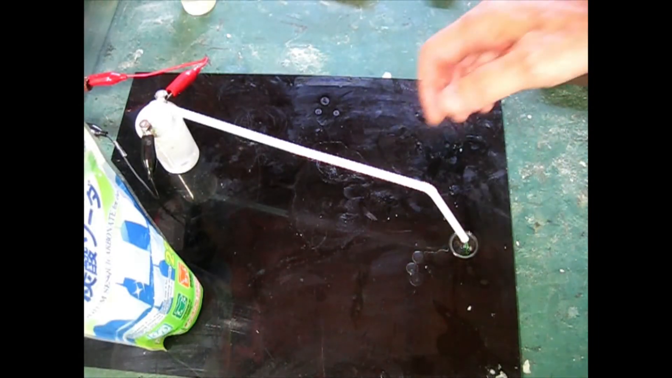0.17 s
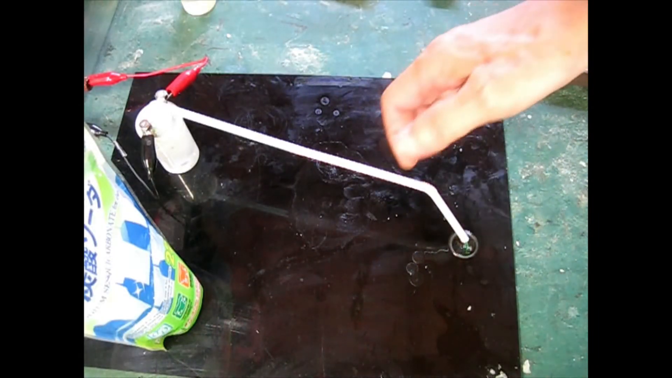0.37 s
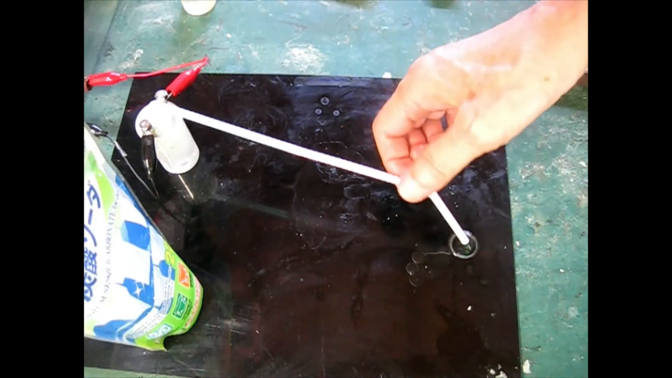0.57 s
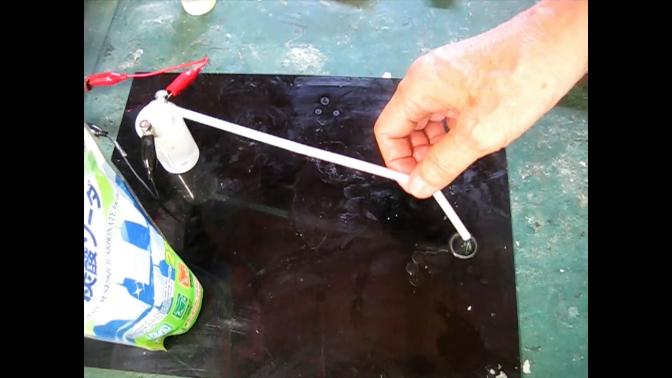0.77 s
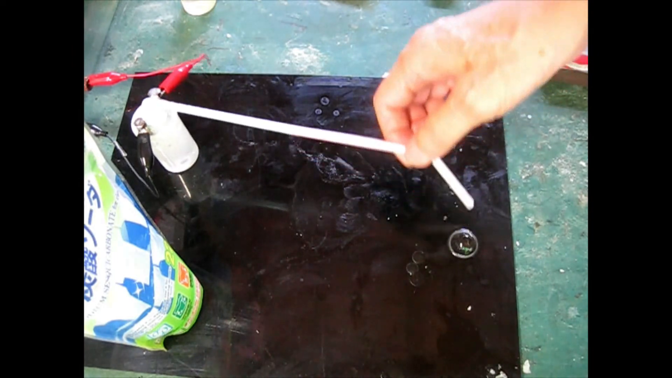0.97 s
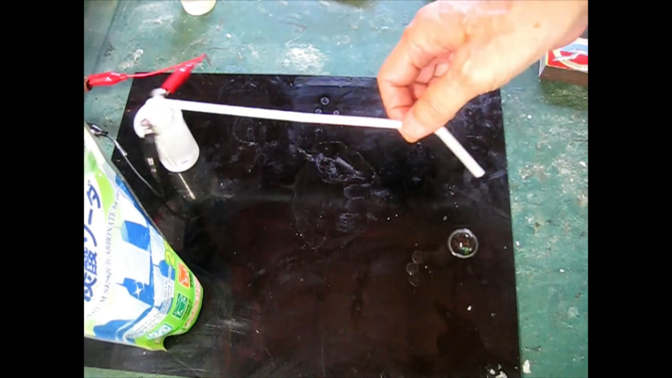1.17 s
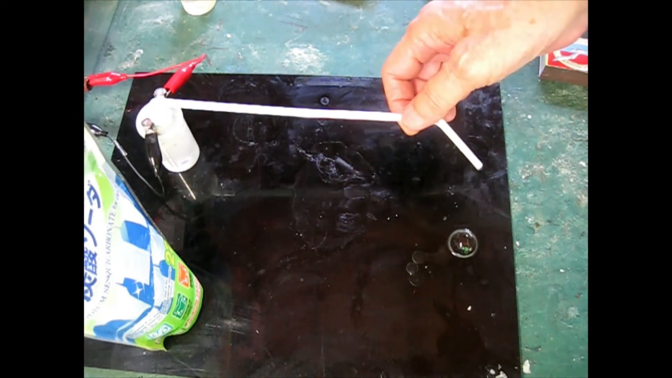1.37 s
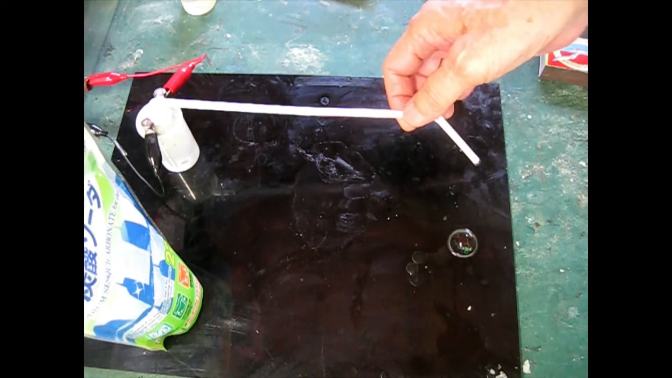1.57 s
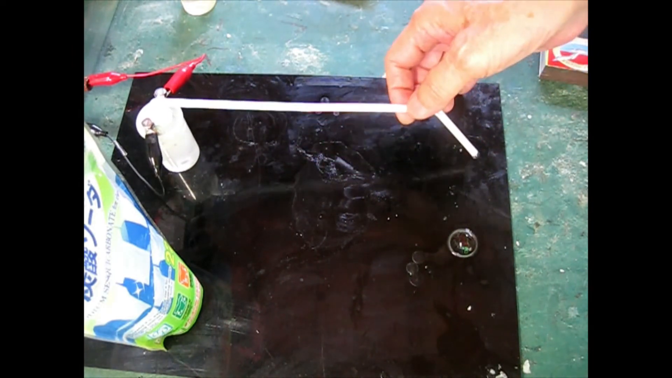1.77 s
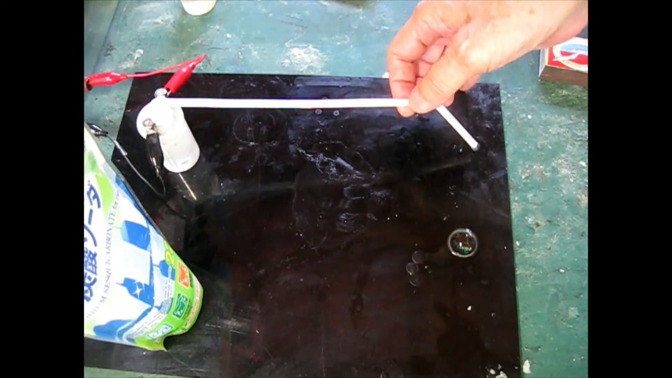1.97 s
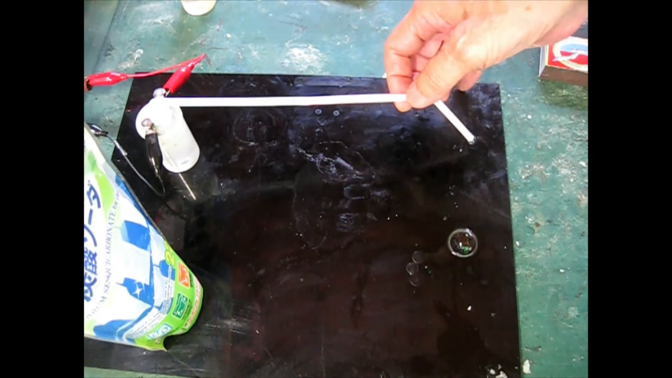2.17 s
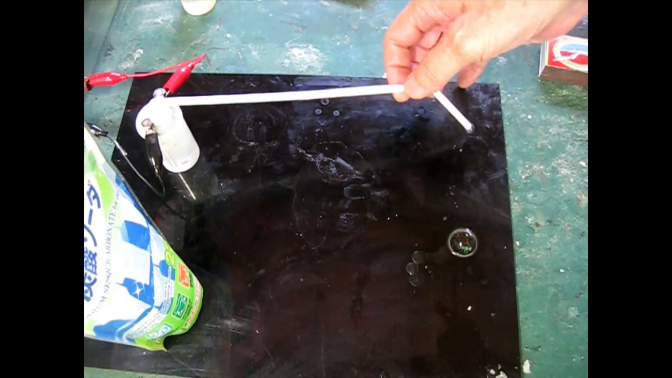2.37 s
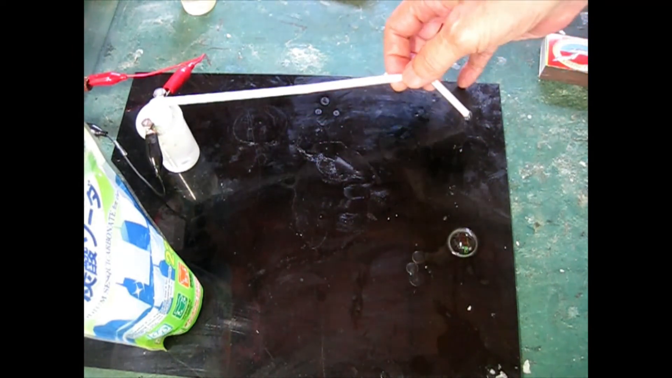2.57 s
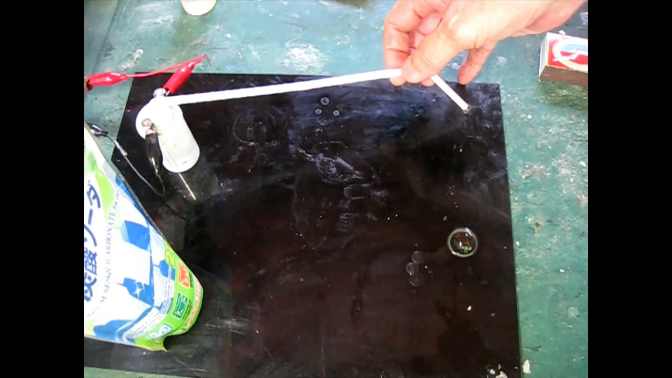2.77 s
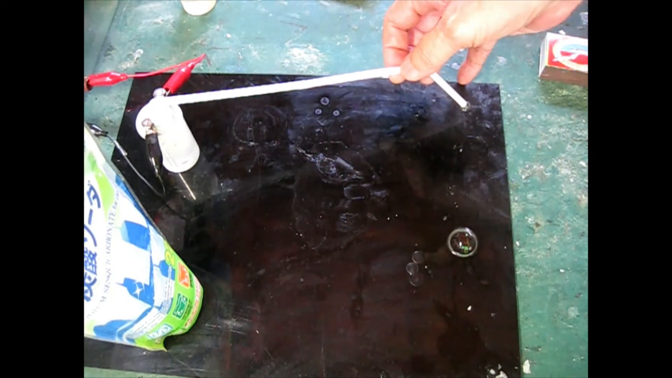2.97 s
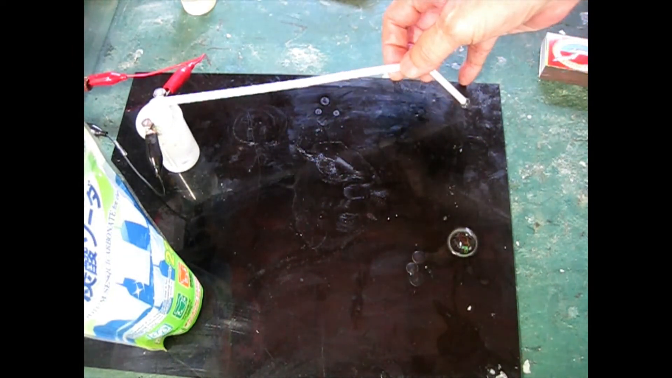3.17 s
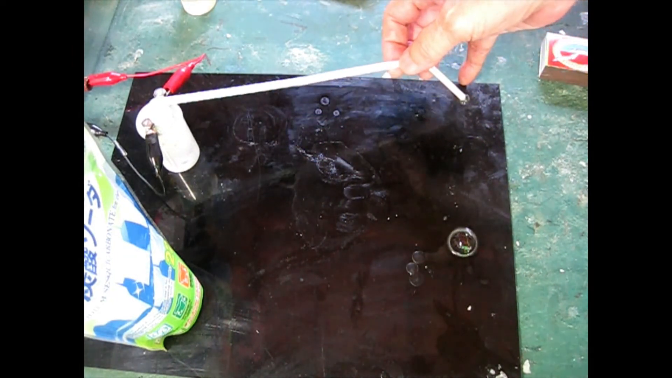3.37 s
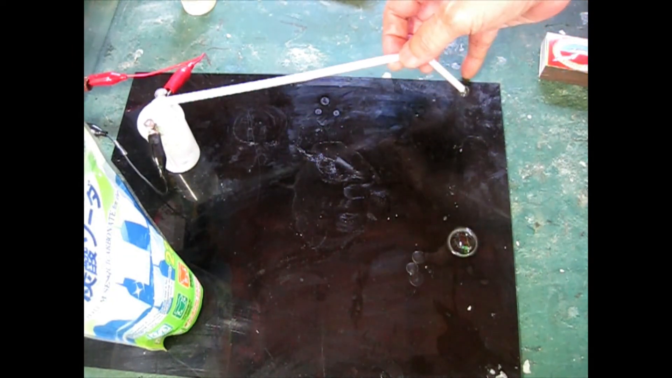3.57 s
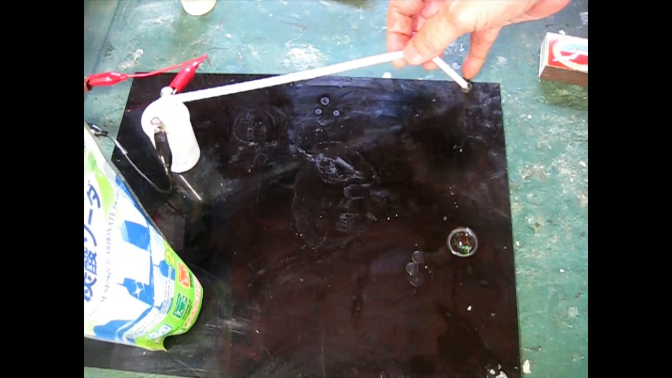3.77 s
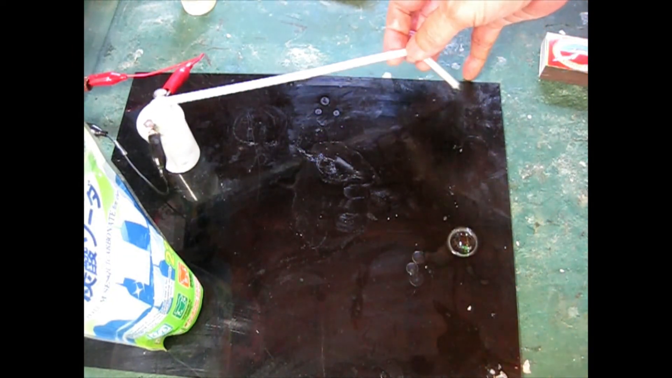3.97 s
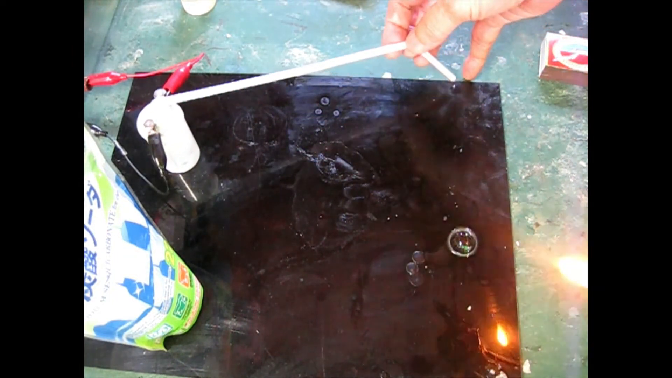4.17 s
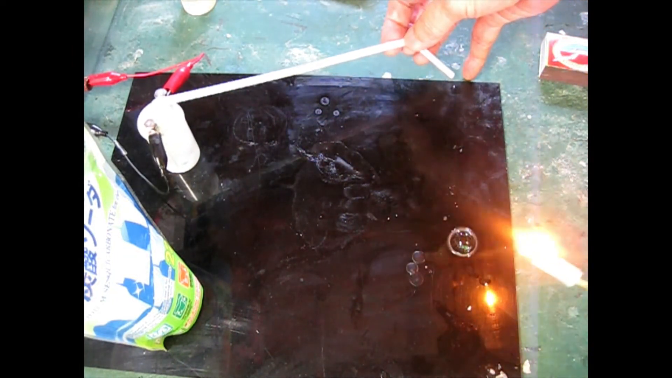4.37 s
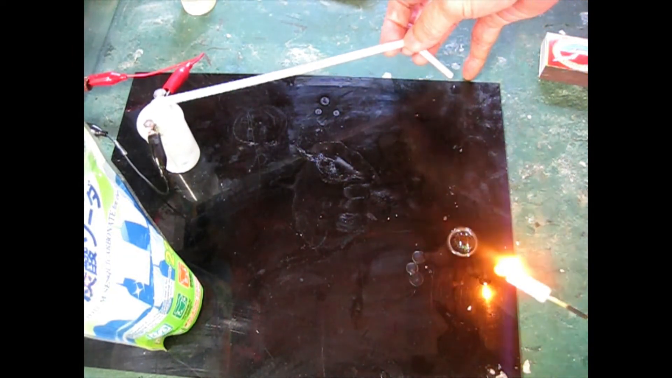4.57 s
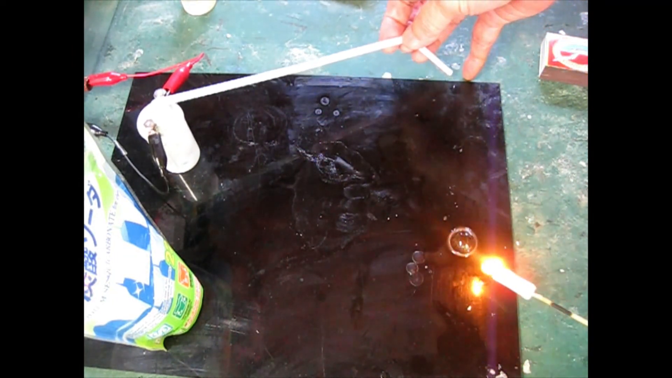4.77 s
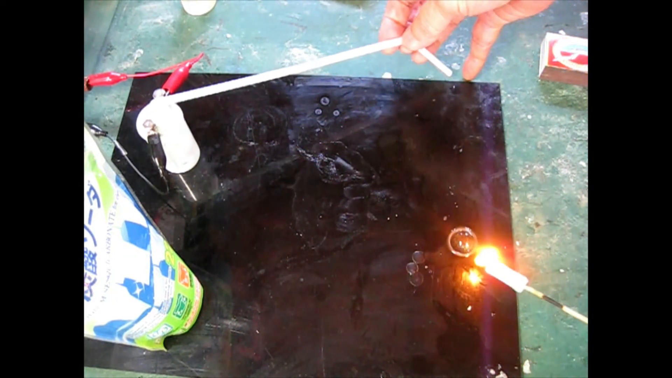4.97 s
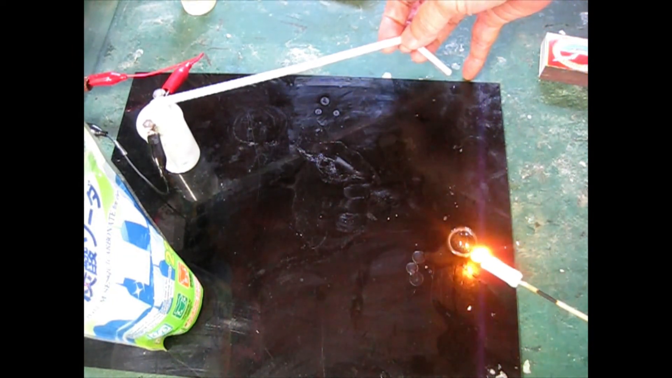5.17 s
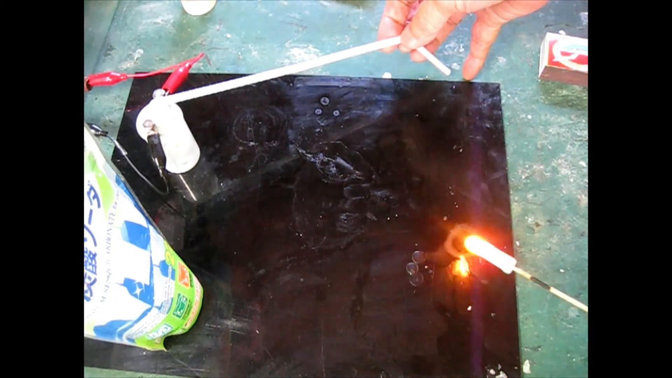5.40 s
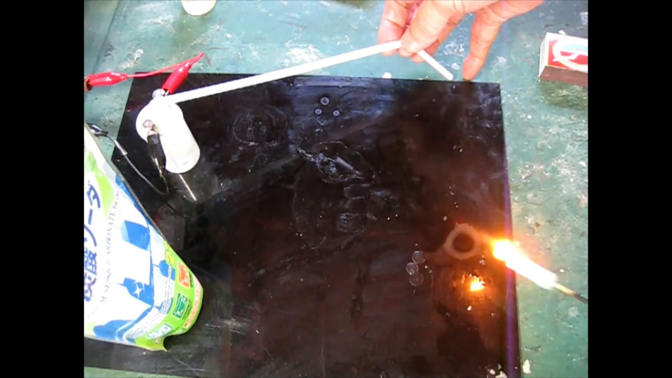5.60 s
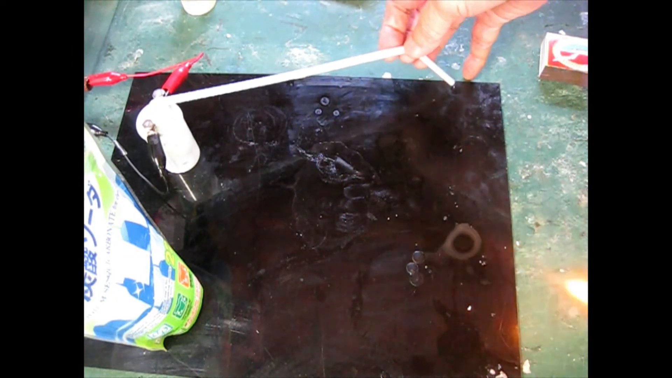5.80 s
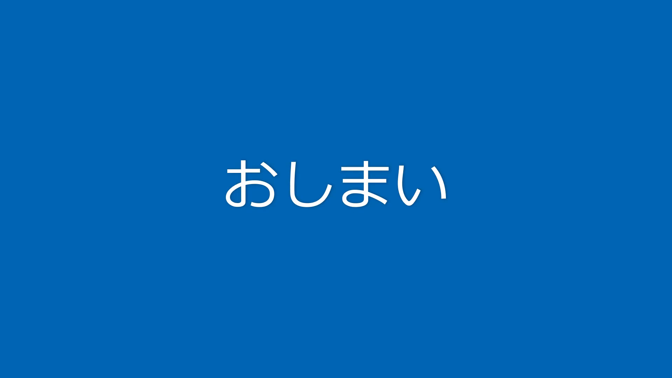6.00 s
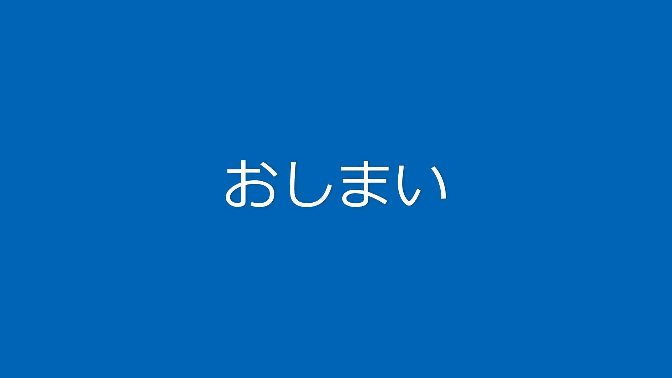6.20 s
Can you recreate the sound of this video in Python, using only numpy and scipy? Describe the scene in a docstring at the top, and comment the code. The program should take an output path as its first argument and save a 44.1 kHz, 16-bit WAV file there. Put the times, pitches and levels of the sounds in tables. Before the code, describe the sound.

Faint clicks and rustles of a plastic straw, then a soap bubble explodes with a sharp, loud bang and a smaller pop.

```python
"""Birds chirp outside a humming room; a hand swings a plastic gas straw away from a soap bubble on a table.
Friction makes the straw rustle, squeak and click, and its knocks set damped modes ringing.
A match crackles and sets the bubble off: the pressure pulse overloads the microphone and reverberates
in the room, and a smaller pop follows. The recorder's limiter ducks after the bang, and the sound
fades out just before the end."""
import sys
import numpy as np
from scipy import signal
from scipy.fft import rfft, irfft
from scipy.io import wavfile
from scipy.ndimage import uniform_filter1d

SR = 44100
rng = np.random.default_rng(int(sys.argv[2]) if len(sys.argv) > 2 else 0)


def waveform_to_disk(signal):
    """Save audio, clipped to [-1, 1], as 16-bit WAV at the path in sys.argv[1]."""
    frames = np.transpose(np.atleast_2d(signal))
    scaled = np.clip(frames, -1, 1) * 32767
    samples = np.round(scaled).astype(np.int16)
    wavfile.write(sys.argv[1], SR, samples)


N = 275175
TIME = np.arange(N) / SR


# Spectra of the blast and of the room's answer. Each row: frequency in Hz, relative level in dB.
BLAST_SPECTRUM = [(30, -16), (130, -8), (330, -21), (680, 0), (820, -0.5), (1080, -0.9), (1400, -20.5),
                  (2150, -1), (3400, -16), (4300, -36), (5300, -11), (6800, -19), (11000, -26),
                  (16000, -39.5)]
BOOM_SPECTRUM = [(80, -16.5), (230, -13), (330, -12), (470, -4), (700, -0.5), (1080, -0.9), (1400, -12.5),
                 (1800, -6), (2400, -5), (3100, -25.5), (4000, -25.5), (4900, -12.5), (5800, -18.5),
                 (6700, -17.5), (8500, -18), (12000, -18.5), (16000, -35)]
# Early reflections from the table and nearby clutter. Each row: delay in seconds, gain.
REFLECTIONS = [(.00114, .39), (.003, .24), (.00809, .1), (.01207, .22)]

def bang(start_s=5.3187, strength_db=34, near_db=-13, room_db=-10.5, clutter_s=0.0045):
    """Impulse response: one pressure pulse is followed by reflections, scattering and reverberation."""
    out, blast = np.zeros(N), pulse(BLAST_SPECTRUM)
    add(out, start_s, blast)
    for delay, gain in REFLECTIONS:
        add(out, start_s + delay, gain * blast)
    add(out, start_s + clutter_s, amp(near_db) * through(tail(scale=0.09), blast))
    add(out, start_s + clutter_s, amp(room_db) * through(tail(), pulse(BOOM_SPECTRUM)))
    return amp(strength_db) * out


# The smaller pop and its bounce off the table. Each row: start in seconds, strength in dB.
POPS = [(5.7636, -16), (5.7660, -4)]
# Their spectrum. Each row: frequency in Hz, relative level in dB.
POP_SPECTRUM = [(47, -45), (80, -30), (186, -4), (296, -27), (504, -2), (672, -13), (930, -10), (1100, 2),
                (1320, -6.5), (1860, -2), (4600, -11.5), (5300, -9), (6000, -14), (7870, -16.5),
                (8990, -17), (11500, -11), (16000, -36)]

def small_pop():
    """Reflection: a weak pulse and its bounce fuse into one pop that briefly excites the room."""
    out = np.zeros(N)
    for start, db in POPS:
        add(out, start, amp(db) * pulse(POP_SPECTRUM))
    return space(out, near_db=-0.5, room_db=-3.5)


# Snaps of the straw and crackles of the match.
# Each row: start in seconds, relative strength in dB, level of the body against the top in dB.
STRAW_SNAPS = [(0.8062, -17.5, -6), (1.0732, -15, -19), (1.183, -14, -29.5), (1.2098, -16, -11),
               (1.2306, -8, -15), (1.2475, -18, -14), (1.319, -14, -14), (1.398, -20, -16),
               (1.4135, -19, -11), (1.4445, -16.5, -12), (1.9603, -15, 7), (1.9797, -15, 12),
               (2.038, -17, -3), (2.113, -17, -2), (2.2846, -11, 1), (2.3064, -12, 1), (2.3568, -15, 0),
               (2.39, -18.5, 6), (2.423, -19, -1), (2.463, -15.5, 0), (2.5475, -10.5, 0), (2.7301, -16, -5),
               (2.755, -21, 0), (2.8906, -18, -10), (3.2053, -15.5, -19.5), (3.9616, -17, -7),
               (4.019, -18.5, 8)]
MATCH_CRACKLES = [(4.3225, -22, -10), (5.045, -27, -13), (5.6552, -23, -14), (5.7002, -25, -14),
                  (5.7302, -17.5, -1), (5.7525, -18, 13), (5.759, -19, -7)]
# A snap's bright top and duller body. Each row: frequency in Hz, relative level in dB.
TOP_SPECTRUM = [(200, -54), (3000, -25), (6500, -7), (9500, -5.5), (11500, 0), (13000, -6.5),
                (16000, -21.5)]
BODY_SPECTRUM = [(60, -26), (300, -3), (750, 0.5), (1100, -12.5), (1600, 1.5), (2900, -8.5), (4300, 1),
                 (5600, -4.5), (8800, -2), (10500, -1.5), (16000, -18.5)]

def snaps_and_crackles(burst_s=0.0013, grit=0.34, gain_db=1):
    """Impulsive excitation: a sharp slip with a trail of tiny ones radiates a broadband click."""
    out, t = np.zeros(N), TIME[:SR // 20]
    top, body = pulse(TOP_SPECTRUM), pulse(BODY_SPECTRUM)
    for start, db, body_db in STRAW_SNAPS + MATCH_CRACKLES:
        slips = (t == 0) + grit * rng.standard_normal(len(t)) * np.exp(-t / burst_s)
        snap = through(slips, top) + amp(body_db) * through(slips, body)
        add(out, start, amp(db + gain_db) * snap / np.linalg.norm(snap))
    return space(out, near_db=-8, room_db=-15)


# The straw and its holder knock on the table.
# Each row: start in seconds, strength in dB, brightness in dB per octave.
KNOCKS = [(0.432, -21, 1), (1.1831, -12, 12.5), (2.1882, -19.5, 7), (2.1933, -16, 4), (2.2032, -21, 5),
          (3.514, -12.5, 0.5)]
# The modes they excite. Each row: frequency in Hz, 60 dB decay time in seconds, relative level in dB.
KNOCK_MODES = [(980, 0.015, -1.5), (1185, .018, 3.5), (1630, 0.02, -7), (2200, 0.02, -2),
               (3060, 0.025, -1.5), (3600, 0.019, -6.5), (4650, 0.0078, -3), (5200, 0.026, -13),
               (6380, 0.016, -9), (11040, 0.01, -7.5)]

def straw_knocks(clack_db=-7, clack_s=0.0011):
    """Impact excitation: light blows clack and ring damped modes; harder contact favours high ones."""
    out, t = np.zeros(N), TIME[:SR // 10]
    for start, db, bright_db in KNOCKS:
        contact = rng.standard_normal(len(t)) * np.exp(-t / clack_s)
        clack = through(contact, pulse(BODY_SPECTRUM))
        clack *= amp(clack_db) / np.linalg.norm(clack)
        add(out, start, amp(db) * (ring(KNOCK_MODES, bright_db) + clack))
    return space(out, near_db=1, room_db=-20)


# The hand bumps the table. Each row: start in seconds, strength in dB, brightness in dB per octave.
BUMPS = [(2.194, -19, 2), (2.286, -22, 10), (2.309, -15.5, 3), (2.39, -26, 4), (2.424, -21, -1),
         (2.462, -22, 1), (2.755, -21, -5), (2.857, -23, -2)]
# The table top's modes. Each row: frequency in Hz, 60 dB decay time in seconds, relative level in dB.
TABLE_MODES = [(279, 0.033, -7), (390, 0.027, -2.5), (604, 0.014, 3.5), (760, 0.017, 2.5),
               (1380, 0.022, -1.5), (1790, 0.019, -3)]

def table_bumps():
    """Damped free vibration: the table top swings for a few cycles after each soft blow."""
    out = np.zeros(N)
    for start, db, bright_db in BUMPS:
        add(out, start, amp(db) * ring(TABLE_MODES, bright_db))
    return space(out, near_db=-7, room_db=-5)


# Fingers slide along the straw, and the straw drags on the table.
# Each row: start in seconds, length in seconds, relative level in dB.
SLIDES = [(.8, 0.24, -45), (1.07, 0.2, -47.5), (1.35, 0.3, -50.5), (1.81, 0.36, -50.5), (2.33, 0.37, -53)]
DRAGS = [(1.6, 0.032, -54), (1.94, 0.24, -53.5), (2.28, 0.437, -50)]
# Spectra of skin on plastic and of the scraped table. Each row: frequency in Hz, relative level in dB.
SLIDE_SPECTRUM = [(200, -42), (3000, -22), (6500, -5.5), (9000, -8.5), (11300, 5), (13000, -4),
                  (16000, -22)]
DRAG_SPECTRUM = [(60, -16), (260, 2.5), (450, 1), (750, 2.5), (1100, -8.5), (1600, 0.5), (2900, -10.5),
                 (4100, 0.5), (5600, -10), (8800, 2.5), (10500, -8), (16000, -15)]

def rubbing(slide_db=-1, drag_db=-2, slide_body_db=-14, catch_db=-9, uneven_db=1.4):
    """Sliding friction: fine slips fizz, coarser ones scrape, and the uneven grip catches at random."""
    grip = amp(uneven_db * drift(14))
    slide, drag = grip * stroke_level(SLIDES), grip * stroke_level(DRAGS)
    fine = grains(per_s=1400, spread_db=4.3, cap=3)
    coarse = grains(per_s=600, spread_db=4.3, cap=3)
    catches = amp(catch_db) * grains(per_s=35, spread_db=3, cap=2)
    fizz = through((fine + catches) * slide * amp(slide_db), pulse(SLIDE_SPECTRUM))
    scrape_level = drag * amp(drag_db) + slide * amp(slide_body_db)
    scrape = through((coarse + catches) * scrape_level, pulse(DRAG_SPECTRUM))
    return space(fizz + scrape, near_db=-7, room_db=-14)


# Skin squeaks on plastic. Each row: start in seconds, length in seconds, top pitch in Hz, level in dB.
SQUEAKS = [(1.056, 0.0223, 2968, -53), (1.077, 0.033, 2776, -54), (1.179, 0.043, 2940, -53.5)]

def squeaks(second_db=-2):
    """Stick-slip oscillation: skin grips and releases quickly, giving a rough note with two overtones."""
    out = np.zeros(N)
    for start, length, hz, db in SQUEAKS:
        note = signal.hilbert(whistle(length, hz, arch=0.045, rough=0.084))
        phase = np.angle(note)
        harmonics = np.cos(phase) + amp(second_db) * np.cos(2 * phase) + np.cos(3 * phase)
        add(out, start, amp(db) * unit(abs(note) * harmonics))
    return space(out, near_db=1.5, room_db=-3)


# Chirps, by their lower voice. Each row: start in seconds, length in seconds, top pitch in Hz, level in dB.
CHIRPS = [(0.222, 0.037, 5930, -41.5), (0.322, 0.028, 5820, -43)]
# A far bird's hoarse peeps. Each row: start in seconds, relative level in dB.
PEEPS = [(1.380, -48.5), (2.083, -45), (2.776, -47), (4.269, -51), (4.975, -48), (5.665, -48.5)]

def birds(upper_ratio=1.14, upper_db=-4, peep_hz=2330, peep_s=0.022, peep_db=-4):
    """Biphonation: the two sides of a syrinx give each chirp two pitches; the far peeps have one."""
    near, far = np.zeros(N), np.zeros(N)
    for start, length, hz, db in CHIRPS:
        for ratio, voice_db in [(1, 0), (upper_ratio, upper_db)]:
            voice = whistle(length, hz * ratio, arch=0.29, rough=0.025, peak_at=0.3)
            add(near, start, amp(db + voice_db) * voice)
    for start, db in PEEPS:
        add(far, start, amp(db) * whistle(peep_s, peep_hz, arch=0.12, rough=0.04))
    chirps = space(near, near_db=-9, room_db=-4)
    return chirps + amp(peep_db) * space(far, near_db=-10, room_db=-6.5)


def faint_ticks(db=-66.5):
    """A Poisson process: tiny bright ticks fall at independent random times."""
    ticks = grains(per_s=16, spread_db=3.5, cap=3)
    return amp(db) * through(ticks, pulse(TOP_SPECTRUM))


# The room air's spectrum and a machine's tones. Each row: frequency in Hz, relative level in dB.
AIR_SPECTRUM = [(15, -30.5), (25, -1), (120, -9), (153, -5), (223, -8), (394, -8), (476, -10), (840, -8.5),
                (1370, -12), (1480, -10.5), (2990, -15), (6920, -19.5), (7920, -21), (11900, -21),
                (16000, -28)]
HUM_TONES = [(150.7, -62), (398.4, -65.5), (1233, -68.5), (1453, -67.5)]

def background(air_db=-51.5, hiss_db=-57, hum_db=-1, waver_hz=2.5):
    """The noise floor: broadband room air and microphone hiss lie under a wavering machine hum."""
    air_level = amp(air_db + 0.35 * drift(5))
    air = air_level * unit(through(rng.standard_normal(N), pulse(AIR_SPECTRUM)))
    hiss = amp(hiss_db) * through(rng.standard_normal(N), pulse(TOP_SPECTRUM))
    hum = np.zeros(N)
    for hz, db in HUM_TONES:
        tone = np.sin(2 * np.pi * np.cumsum(hz + waver_hz * drift(25)) / SR)
        hum += amp(db + hum_db) * unit(tone * (1 + 0.37 * drift(14)))
    return air + hiss + hum


# The room's reverberation. Each row: frequency in Hz, 60 dB decay time in seconds at scale 1.
ROOM_DECAY = [(150, .32), (800, 0.26), (2300, 0.27), (6000, 0.25), (14000, 0.15)]

def tail(scale=1):
    """Reverberation of energy 1: each band decays at its own rate; a smaller scale is a smaller space."""
    hz, t, bands = signal.stft(rng.choice([-1., 1.], SR), SR, nperseg=256)
    t60 = scale * read(ROOM_DECAY, hz)[:, None]
    echo = signal.istft(bands * 1000. ** (-t / t60), SR, nperseg=256)[1][:SR]
    echo *= np.clip(TIME[:SR] / (0.0043 * scale), 0, 1)  # the reflections build up
    return echo / np.linalg.norm(echo)


def space(x, near_db, room_db):
    """Multipath propagation: direct sound, quick scatter from the table's clutter, and the room."""
    return x + amp(near_db) * through(x, tail(scale=0.22)) + amp(room_db) * through(x, tail())


def ring(modes, bright_db):
    """Modal superposition: damped sines of total energy 1, tilted by bright_db per octave."""
    t = TIME[:SR // 10]
    sound = np.zeros(len(t))
    for hz, t60, db in modes:
        envelope = amp(db + bright_db * np.log2(hz)) * 1000. ** (-t / t60)
        sound += envelope * np.sin(2 * np.pi * hz * t) * rng.choice([-1, 1])
    return sound / np.linalg.norm(sound)


def whistle(length, hz, arch, rough, peak_at=0.37):
    """Frequency modulation: a short note's pitch rises to a peak and sinks, with random flutter."""
    progress = np.linspace(0, 1, round(length * SR))
    flutter = unit(uniform_filter1d(rng.standard_normal(len(progress)), size=40))
    bend = np.sin(np.pi * np.interp(progress, [0, peak_at, 1], [0, 0.5, 1]))
    pitch = hz * (1 - arch * (1 - bend) + rough * flutter)
    return unit(np.sin(2 * np.pi * np.cumsum(pitch) / SR) * bend)


def stroke_level(strokes, attack_s=0.025, release_s=0.065):
    """Amplitude envelope: each stroke swells, holds, and decays exponentially when the hand stops."""
    level = np.zeros(N)
    for start, length, db in strokes:
        attack = np.clip((TIME - start) / attack_s, 0, 1)
        release = np.exp(-np.maximum(TIME - start - length, 0) / release_s)
        level += amp(db) * attack * release
    return level


def grains(per_s, spread_db, cap):
    """Shot noise: random tiny slips, a few much larger than the rest."""
    size = amp(spread_db * np.minimum(rng.exponential(1, N), cap)) * rng.choice([-1, 1], N)
    return unit(size * (rng.random(N) < per_s / SR))


def drift(rate_hz):
    """Low-pass noise: slow wandering of rms 1."""
    slow = np.fft.rfftfreq(N, 1 / SR) < rate_hz
    return unit(irfft(rfft(rng.standard_normal(N)) * slow, N))


def pulse(spectrum, size=4096):
    """Minimum phase: the sharpest causal pulse with this spectrum, of energy 1."""
    hz = abs(np.fft.fftfreq(size, 1 / SR))
    log_gain = np.log(amp(read(spectrum, hz)))
    response = np.exp(np.conj(signal.hilbert(log_gain)))
    shape = np.fft.ifft(response).real[:size // 2]
    return shape / np.linalg.norm(shape)


def through(x, response):
    """Convolution with an impulse response."""
    return signal.fftconvolve(x, response)[:len(x)]


def add(mix, start_s, sound):
    """Superposition of a sound on the mix, from start_s on."""
    part = mix[round(start_s * SR):][:len(sound)]
    part += sound[:len(part)]


def read(points, hz):
    """Interpolation along a log-frequency axis."""
    f, value = np.transpose(points)
    return np.interp(np.log(hz + 1), np.log(f + 1), value)


def unit(x):
    """Normalisation to rms 1."""
    return x / np.sqrt(np.mean(x ** 2) + 1e-20)


def amp(db):
    """Decibels as an amplitude ratio."""
    return 10 ** (np.asarray(db) / 20)


def scene():
    """Linear superposition: the pressures of all sources add in one channel."""
    handling = rubbing() + squeaks() + snaps_and_crackles() + straw_knocks() + table_bumps()
    return (handling + faint_ticks() + background() + birds() + bang() + small_pop())[None]


def limiter(x, threshold_db=-4, depth_db=15.5, recover_db_per_s=193, late_s=0.00408, attack_s=0.0007):
    """Gain reduction: a peak turns the level down, late and by at most depth_db; it recovers steadily."""
    over_db = np.maximum(20 * np.log10(abs(x[0]) + 1e-9) - threshold_db, 0)
    recovery_db = recover_db_per_s * TIME
    held_db = np.minimum(np.maximum.accumulate(over_db + recovery_db) - recovery_db, depth_db)
    delayed_db = np.interp(TIME - late_s, TIME, held_db)
    lag = np.exp(-1 / (attack_s * SR))
    return x * amp(-signal.lfilter([1 - lag], [1, -lag], delayed_db))


def record(dry, ceiling=0.83, notch_hz=7893, notch_width_hz=1200, rolloff_hz=14800, edge_hz=16100):
    """Saturation: overload flattens the peaks the limiter misses; filters and a fade-out follow."""
    ducked = limiter(dry)
    clipped = ducked / (1 + (ducked / ceiling) ** 6) ** (1 / 6)
    notched = signal.lfilter(*signal.iirnotch(notch_hz, notch_hz / notch_width_hz, SR), clipped)
    rolled = signal.lfilter(*signal.butter(3, rolloff_hz, fs=SR), notched)
    faded = rolled * np.interp(TIME, [5.905, 5.96], [1, 0])
    low_pass = signal.firwin(255, edge_hz, window=("kaiser", 9), fs=SR)
    return signal.oaconvolve(faded, low_pass[None], "same")


dry = scene()
out = record(dry)
waveform_to_disk(out)
```